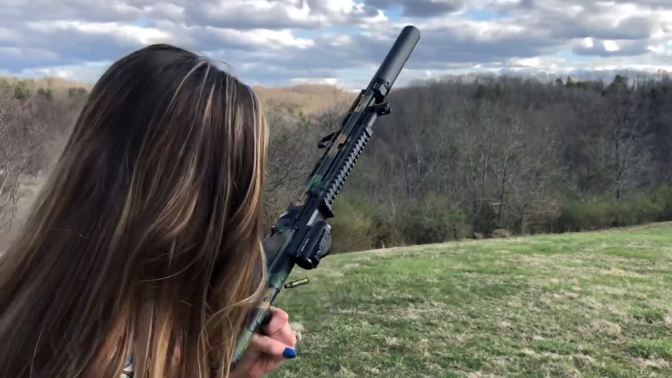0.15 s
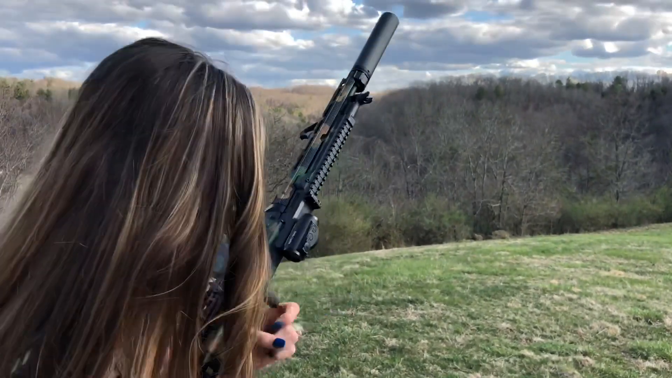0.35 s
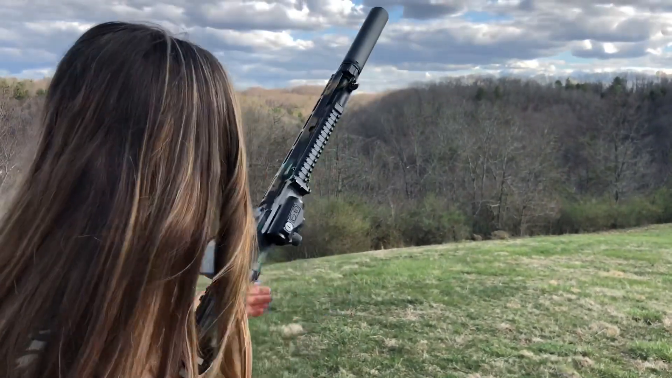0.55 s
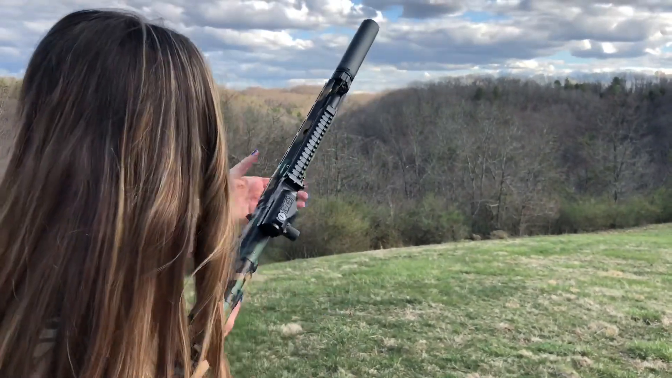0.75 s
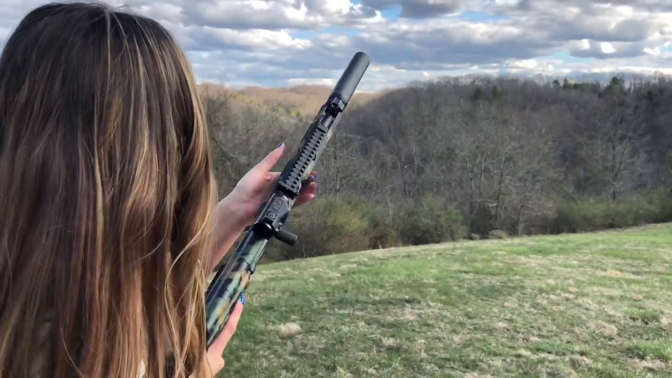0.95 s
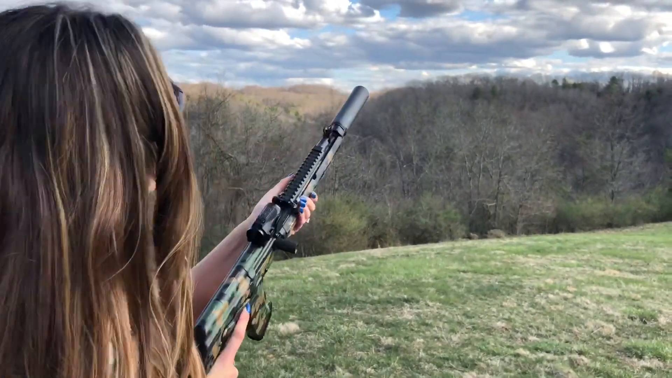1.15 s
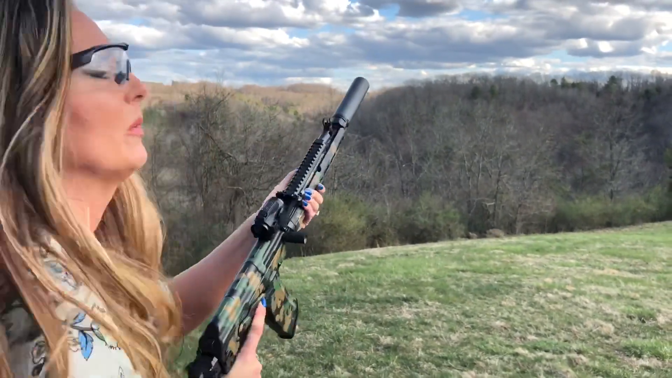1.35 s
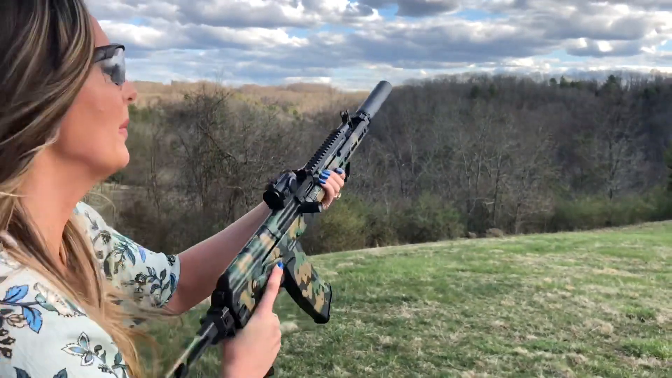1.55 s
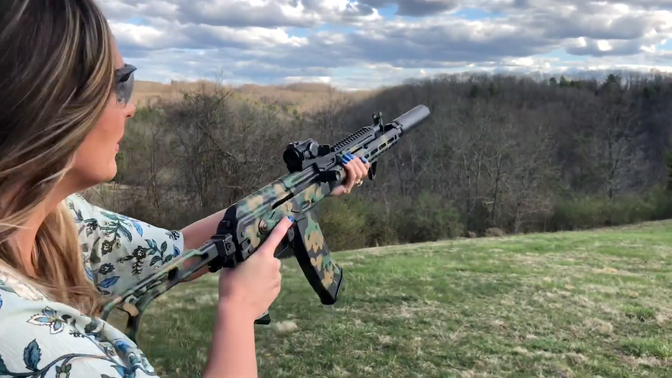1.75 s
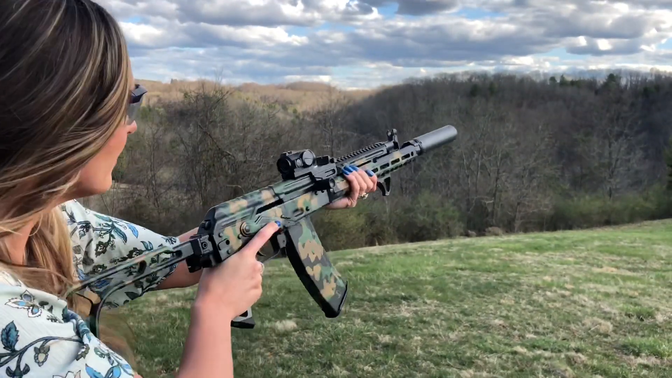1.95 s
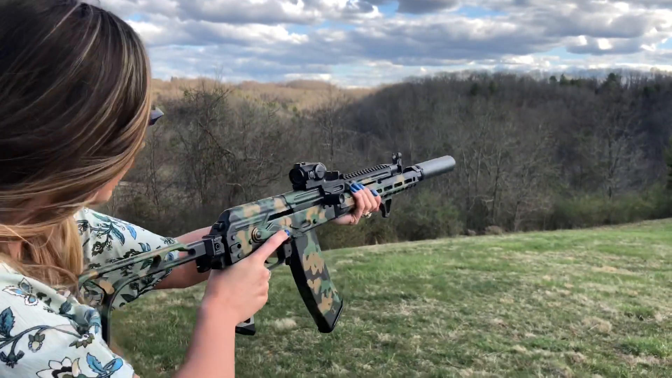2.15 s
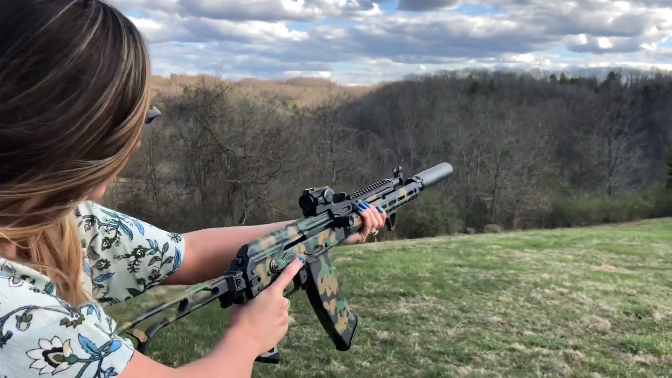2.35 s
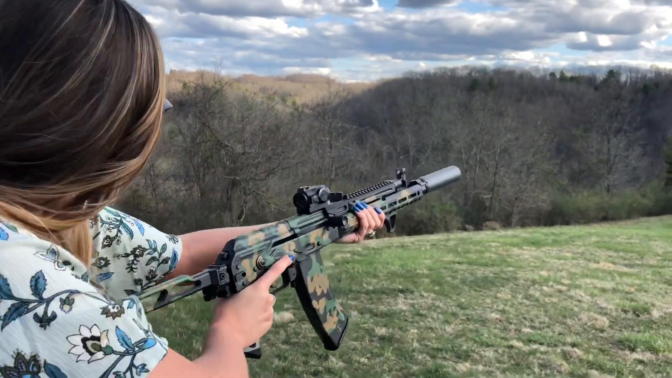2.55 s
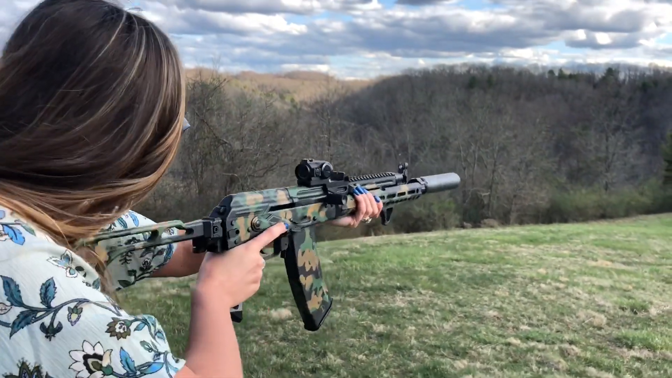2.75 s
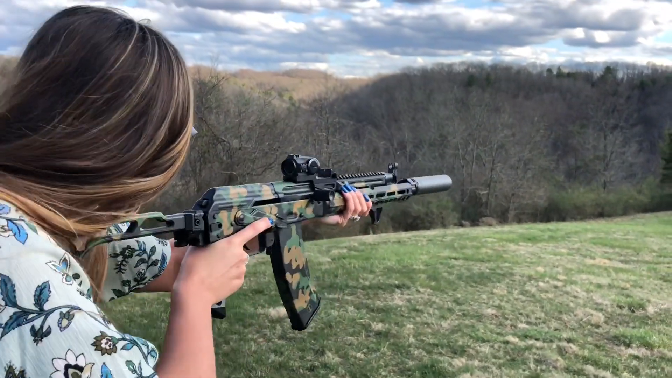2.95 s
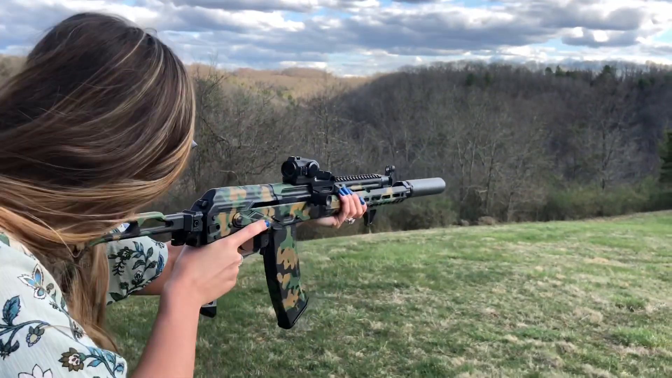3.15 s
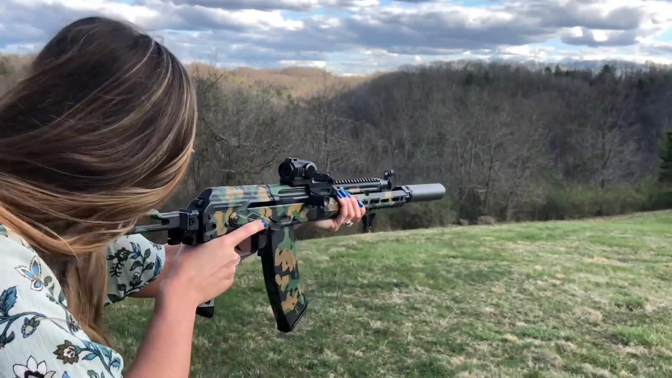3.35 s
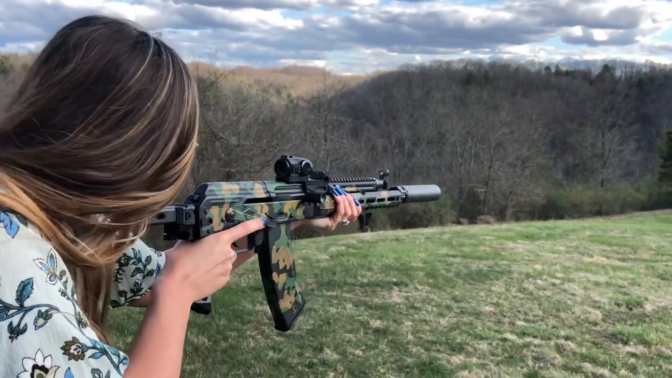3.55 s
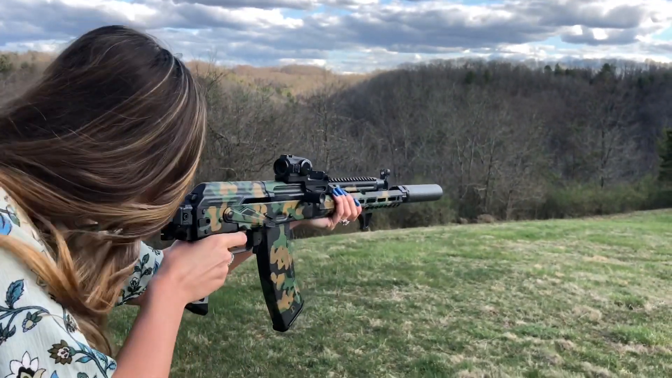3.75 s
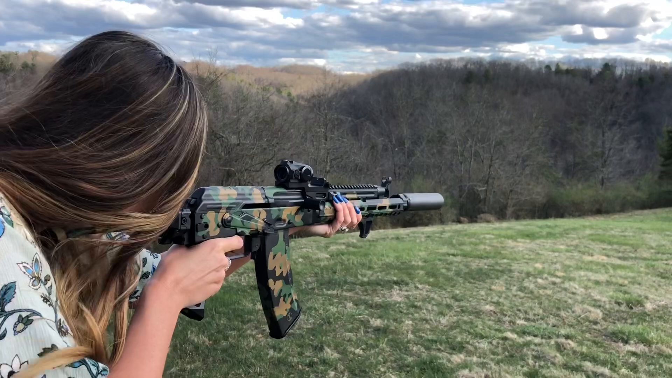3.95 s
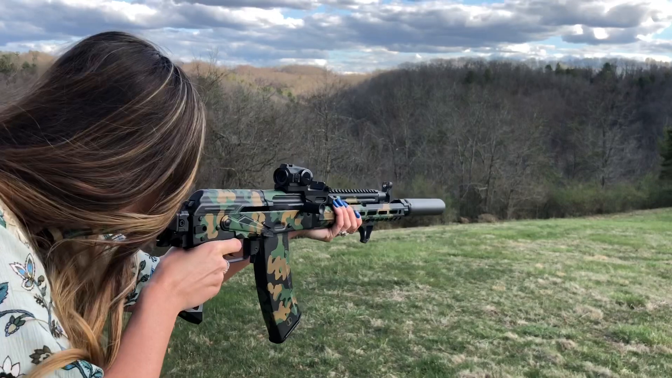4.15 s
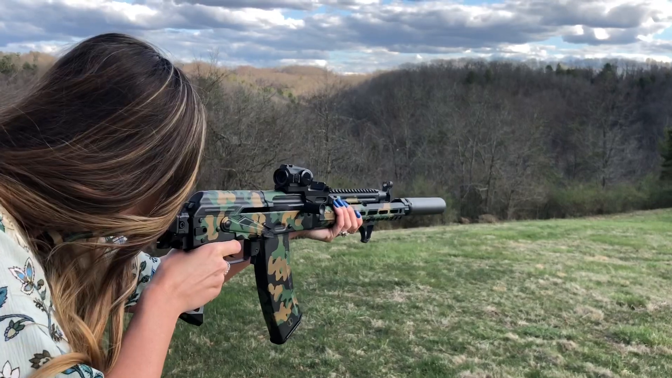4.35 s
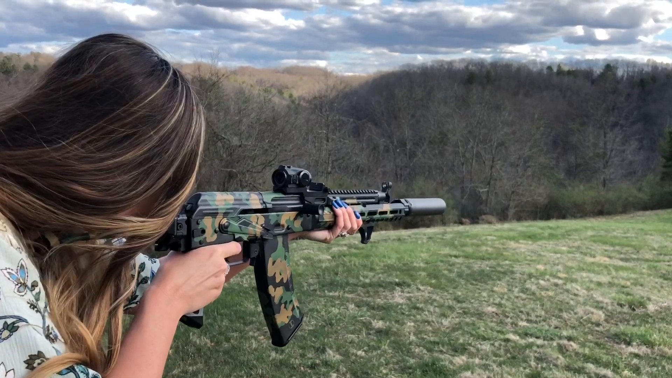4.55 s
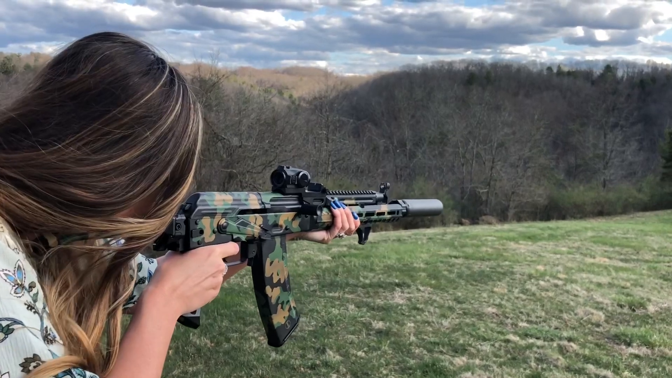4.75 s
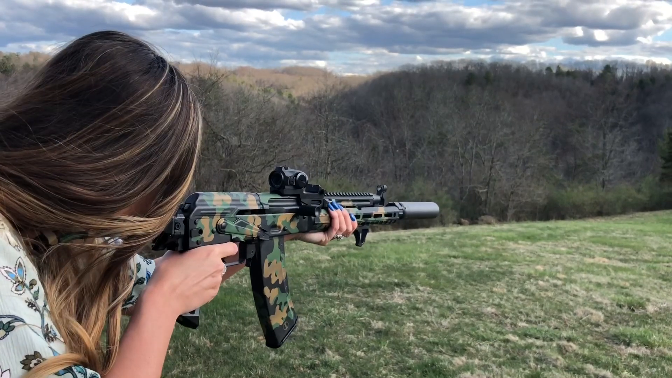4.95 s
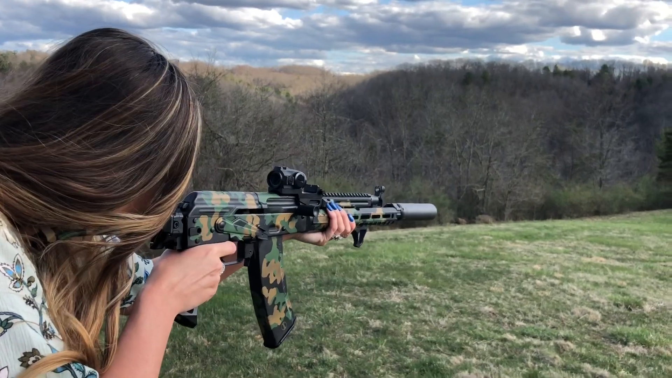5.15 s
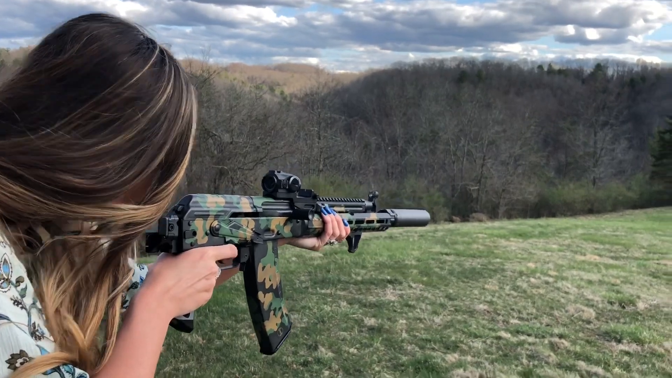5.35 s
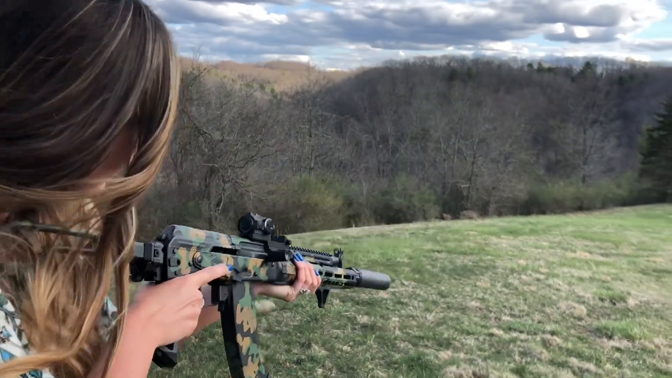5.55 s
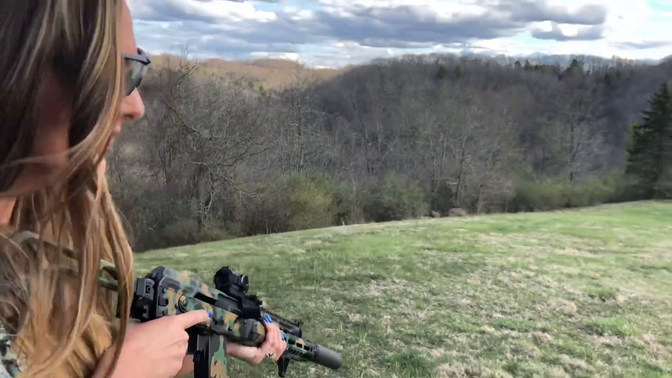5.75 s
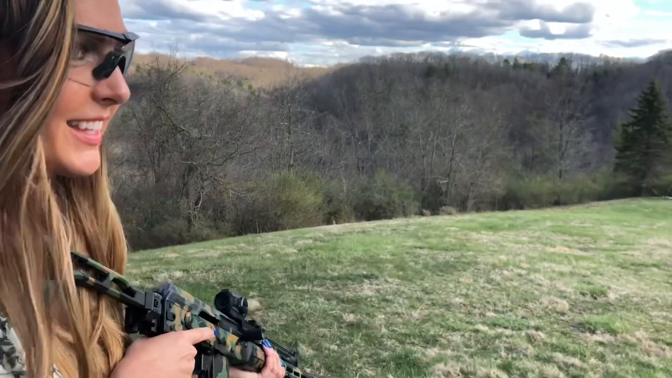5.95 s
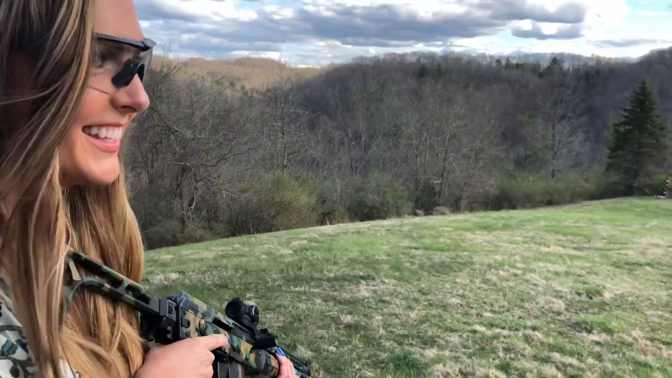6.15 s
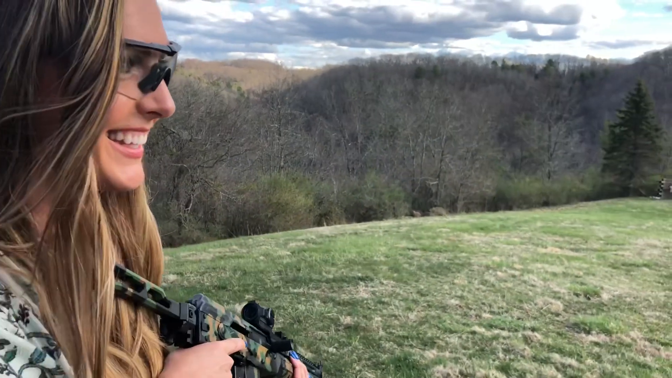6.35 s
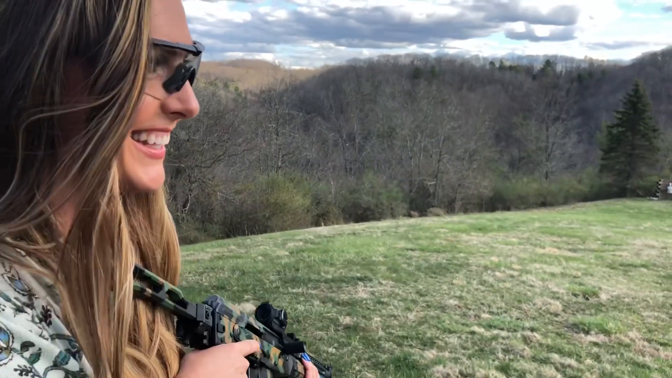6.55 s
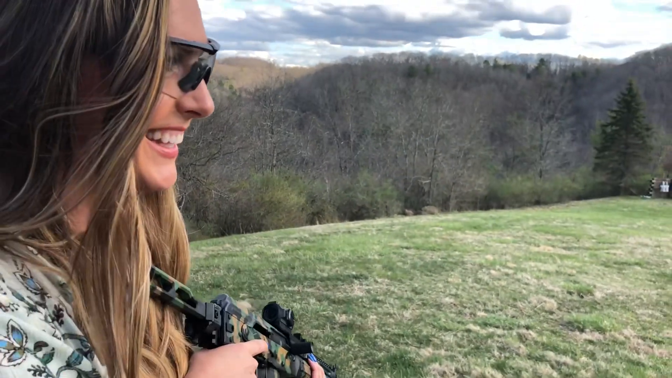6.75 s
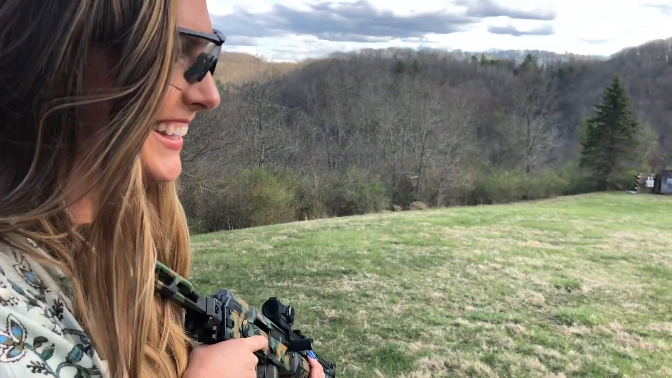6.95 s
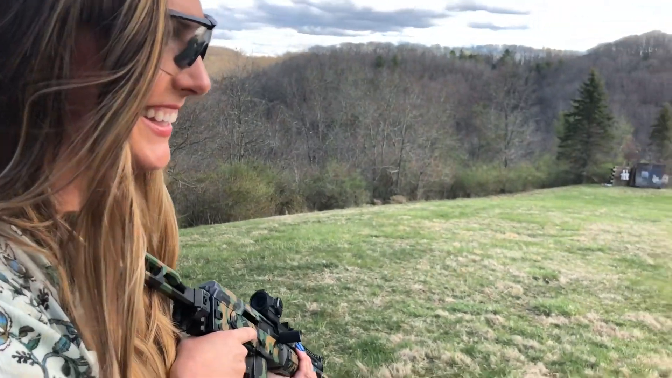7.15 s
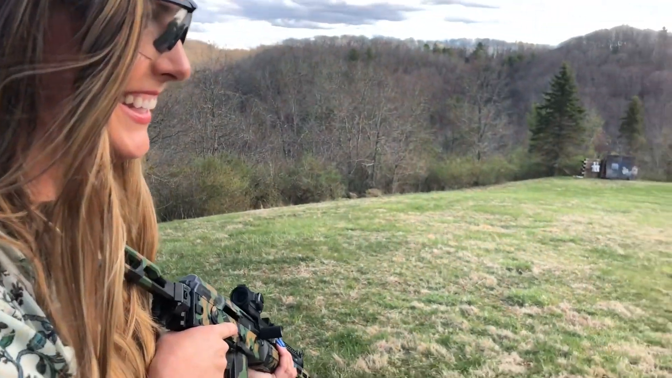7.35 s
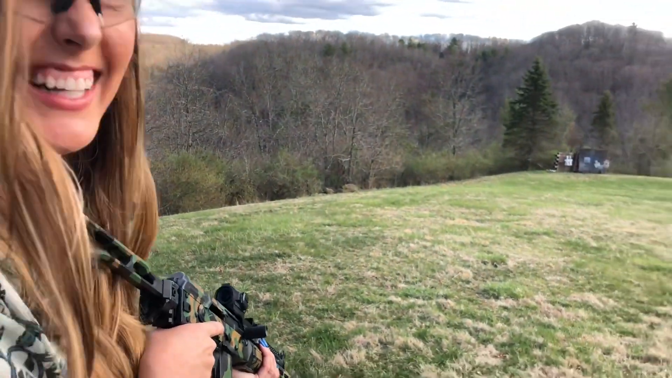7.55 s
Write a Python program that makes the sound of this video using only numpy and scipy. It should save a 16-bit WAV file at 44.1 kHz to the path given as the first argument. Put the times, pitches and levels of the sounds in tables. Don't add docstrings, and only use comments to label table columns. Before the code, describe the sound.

Outdoors on a grassy hillside, a handheld microphone beside the shooter catches loud, dry metallic racking with a spring scrape and slight ring. Faint frogs, distant hum and low wind puffs fill the pause. A single muffled rifle shot pops together with mechanical clatter; wooded slopes scatter it, and a bullet smacks distant steel with a ringing splash. A lever clicks soon after, leaving soft open-air ambience.

```python
import sys
import numpy as np
from scipy import signal
from scipy.io import wavfile
from scipy.ndimage import uniform_filter1d

SR = 44100
rng = np.random.default_rng(int(sys.argv[2]) if len(sys.argv) > 2 else 0)


def unload_wav(signal):
    wavfile.write(
        sys.argv[1],
        SR,
        np.round(np.clip(np.atleast_2d(signal).T, -1, 1) * 32767).astype(np.int16),
    )


def ratio(d):
    e = np.asarray(d, float) / 20
    return 10 ** e


N = 339129
TIME = np.arange(N) / SR

# t/s, peak/dB, body/dB, edge/dB (both re middle modes), rattle t60/s
PULL = [(.0005, -44, 0, -23.5, 0.073), (.1855, -15.5, -10, 0, .012), (.1918, -7, -15, 6, .008),
        (0.0155, -34, 4.5, -30, 0.012), (.0195, -32, 6.5, -28.5, 0.011), (0.0243, -21, -9, -2.5, 0.049),
        (0.0993, -17.5, -11.5, -1.5, 0.044), (0.118, -32, 9.5, -12.5, 0.022),
        (0.1232, -16, -11, -8.5, 0.013), (0.13, -12, -9.5, 4, 0.015), (0.144, -7, -13.5, 2, 0.027),
        (0.1603, -3, -4.5, 7, 0.013), (.1615, -4, -8, 4, .024), (.1475, -17, -12, 3, 0.014),
        (.1015, -18.5, -9.5, 0, 0.035), (0.182, -17, 7, -6, 0.013), (0.1908, 0.4, -24.5, 9.5, 0.0059),
        (0.2032, -0.5, -12, 5, 0.011), (0.2113, -10.5, -5, -12, 0.0089), (0.2146, -10, -6, -3.5, 0.015),
        (0.2222, -4.5, -15.5, 3, 0.019), (0.237, -21.5, 4, -9, .009), (0.2495, -27, -8.5, -6, 0.016)]
RETURN = [(0.3316, -39.5, -6, -26.5, 0.01), (0.3348, -33, -6, 0.5, 0.02), (0.348, -40, -6, -20, 0.054),
          (0.4243, -27, -10.5, -10, 0.017), (0.4392, -22, -10.5, -9, 0.0095),
          (0.442, -16, -11, -10.5, 0.02), (0.4568, -10.5, -15, 5, 0.013), (0.466, -16.5, -2, -3.5, 0.015),
          (0.4783, -13, -15, -3.5, 0.015), (.4808, -17, -10, -4.5, .012), (.5045, -19, -10, 3, .01),
          (0.4838, -12.5, -11.5, -10.5, 0.013), (.487, -13.5, -8.5, -4, 0.012),
          (0.4912, -4.5, -15.5, 7.5, 0.0096), (0.5006, 0.5, -25, 4, 0.007), (0.5082, -3, -9.5, 5, 0.01),
          (.5096, 0, -7.5, 7, .012), (.5035, -9.5, -8.5, 0.5, 0.009), (.519, -17.5, -12, 3, .02),
          (0.5245, -17.5, -14, 3.5, 0.016), (.528, -14.5, -14, 4, 0.048)]
CYCLING = [(4.5733, -33, -8, -18.5, 0.016), (4.582, -36.5, -2, -7.5, .014), (4.5973, -14, -6.5, 1, 0.01),
           (4.5995, -10.5, -3, -3.5, 0.011), (4.6048, -2, -10, 6.5, 0.007), (4.6088, -9.5, -14.5, 3, 0.012),
           (4.6205, -19.5, -19, 6, 0.011), (4.6222, -11.5, -17.5, 9.5, .008),
           (4.624, -14, -16.5, 6.5, .012), (4.6458, -10, -4, 1, .008), (4.6436, 0, -7, 3, 0.007),
           (4.6444, -8, -12, 7, .006), (4.5862, -42, -8, -3, .008), (4.5942, -34.5, -3.5, -11.5, .008),
           (4.631, -19.5, -16, 3, .012), (4.6515, -23.5, 1.5, -1.5, .02), (5.4095, -23.5, -22, -1, 0.024)]
# t/s, level/dB, f/Hz, t60/s
PINGS = [(.1443, -12, 5600, .008), (.1608, -12, 9290, .01), (.1612, -11.5, 14800, .008),
         (.1915, -7, 9795, .006), (.2034, -7.5, 4100, .008), (.2114, -12, 3002, .007),
         (.2228, -15, 7290, .011), (.4572, -17, 5800, .01), (.5008, -10.5, 3301, .01),
         (.5012, -12, 8300, .01), (.5086, -9.5, 6000, .008), (.5088, -12.5, 8580, .008),
         (4.6438, -10, 5120, .008), (4.6442, -10, 2608, .01), (4.6, -18.5, 2107, .012),
         (5.4098, -29.5, 3320, .014), (5.4098, -37, 6260, .012)]
# f/Hz, t60/s
RECEIVER = [(904, 0.038), (1290, 0.023), (1650, 0.037), (2300, 0.018), (2700, 0.016), (3320, 0.038),
            (4090, 0.026), (5070, 0.011), (5970, 0.021), (6830, 0.02), (7600, 0.019), (8900, 0.01),
            (10100, 0.0074), (11300, 0.016), (12800, 0.0059), (14000, 0.0077), (14900, 0.01),
            (15800, 0.015)]

# start/s, full/s, end/s, level/dB, tilt/(dB/octave)
STROKES = [
    (0.094, 0.12, .16, -32.5, -2.25),
    (0.17, 0.185, .228, -28, -1.5),
    (0.42, 0.4777, .515, -26, 0.5),
    (4.572, 4.585, 4.595, -52, -0.5),
    (0.38, .42, .435, -59, -3),
    (.225, 0.29, 0.22, -42, -4),
]
# start/s, full/s, end/s, level/dB, tilt/(dB/octave)
VENTS = [
    (4.594, 4.604, 4.612, -23.5, 2),
    (4.6, 4.61, 4.634, -29.5, 2.4),
    (4.636, 4.644, 4.648, -29.5, 0),
]
# f/Hz, density/(dB per Hz)
SLIDE = [(180, -52.5), (300, -21.5), (877, -1), (1170, -4), (2280, -3), (3360, 0.5), (4390, -6.5),
         (5740, -3), (14900, -7.5), (16500, -16)]

# f/Hz, level/dB, t60/s
BOLT = [(4317, -22, 0.2), (5093, -8, 0.12), (5669, -14, .08), (6175, -18, 0.073), (6708, -5, 0.1),
        (7736, -30, 0.12), (9964, -9, 0.14), (10580, -2, 0.15), (10690, -8, 0.1), (10900, -22, 0.18),
        (11030, -7, 0.13), (11930, -9, 0.066), (12210, -41, 0.26)]
CASE_RING = [(3085, 2, .9), (3250, 1, .9), (3256, -8, 1.8)]
HANDLE = [(3688, -10, 0.12), (4231, -13, 0.15), (4635, 0, 0.09), (5292, -2, 0.068), (5701, -6, 0.087),
          (6148, -6, 0.071), (7074, -3, 0.061), (9970, -6, 0.099), (10320, -16, 0.13), (10590, -8, 0.17),
          (11310, -13, 0.095), (12000, -14, 0.12)]
SPRING = [(554, 0, .8), (888, 2, .12), (1650, 8, .1), (1930, 6, .08)]
SPRING_KNOCK = [(900, 1, .04)]
LUG = [(7900, 0.5, 0.034)]
STOCK = [(466.3, 0, 0.12), (330, -9.5, 0.047)]
CAN = [(947, -4, .2), (3720, 3, .27), (8600, -2, .12), (11790, -8, .2)]
LEVER = [(953, -1, .062), (1260, -3, .03), (1669, -6, .02), (2050, -10, .02), (2950, -2, .018),
         (3380, 6, .022), (4450, -1, .018), (6100, -3, .018), (10200, -8, .015)]
PLATE = [(872, -5, 0.75), (1114, -6, 0.75), (1723, -3, 0.61), (1742, -9, .4), (2466, 0, 0.3),
         (2837, -5, 0.52), (3257, -6, 0.4), (3935, -8, 0.45), (4081, -6, 0.41), (4683, 0, 0.39),
         (4737, -11, 0.55), (5373, -9, 0.45), (5771, -5, 0.29), (6029, -17, 0.42), (6266, -11, 0.35),
         (6358, -14, 0.41), (6869, -12, 0.28), (7585, -6, 0.21), (7773, -11, 0.23), (8236, -13, 0.42),
         (8915, -7, 0.14), (9609, -10, 0.39), (11060, -22, 0.51), (11820, -30, 0.31), (13430, -34, 0.38)]
STAND = [(204, 7.5, 0.13), (120.4, -2, 0.38)]
# t/s, level/dB, modes
RINGS = [(.213, -35, STOCK), (.5, -40.5, STOCK), (0.024, -45, HANDLE), (.24, -60.5, SPRING[:1]),
         (0.13, -22, LUG), (.494, -23, SPRING_KNOCK), (.506, -17, SPRING_KNOCK), (0.524, -40.5, SPRING[1:]),
         (0.521, -21, BOLT), (0.54, -56.5, CASE_RING[:1]), (.62, -57, CASE_RING[1:]), (4.647, -47.5, CAN),
         (5.003, -41, PLATE[:2]), (5.003, -38.5, PLATE[2:18]), (5.003, -39.5, PLATE[18:]),
         (5.002, -48.5, STAND), (5.4105, -29.5, LEVER)]

# t/s, peak/dB, centre f/Hz
STRIKE = [
    (5.0004, -16.5, 7060),
    (5.0034, -15.5, 7200),
    (5.0045, -25, 4480),
    (5.007, -20, 4960),
    (5.0094, -13.5, 3580),
    (5.012, -20, 4000),
    (5.019, -23, 3000),
]
# f/Hz, density/(dB per Hz)
SPLASH = [(240, -65), (400, -38.5), (581, -19), (740, -9), (899, -5), (1550, -0.5), (2150, -6),
          (2800, -5.5), (5060, -9), (8060, -3), (12700, -25), (15700, -48), (16500, -58)]
# f/Hz, t60/s
SPLASH_T60 = [(500, 0.31), (1300, 0.62), (3500, 0.93), (9000, 0.21), (16000, 0.12)]

# arrival/s, end/s, first level/dB, last level/dB, first tilt/(dB/octave)
ECHOES = [
    (0.628, 0.708, -53, -71, -0.5),
    (0.639, 1.201, -58, -84.5, -2.5),
    (4.685, 4.929, -52, -60, 7),
    (4.797, 5.011, -60, -57.5, 2.5),
]
# f/Hz, density/(dB per Hz)
SLOPES = [(240, -41), (400, -22), (885, -3.5), (1170, -11.5), (1310, -7), (2550, -1), (3170, 2.5),
          (3820, -7.5), (4400, -0.5), (7820, -7.5), (15000, -15.5), (15700, -13.5), (16500, -32)]
# t/s, peak/dB, centre f/Hz, length/s
TREES = [(4.832, -55, 4700, 0.064), (4.932, -53, 4300, 0.042), (4.691, -48, 1700, 0.0093),
         (4.727, -49.5, 2700, 0.012), (4.775, -52, 5000, 0.015), (4.801, -46, 3200, 0.0087),
         (4.833, -50, 4400, 0.012), (4.72, -54, 9400, .05), (4.853, -50, 4600, .014),
         (4.895, -55, 4600, 0.021), (4.975, -52, 4900, 0.011), (4.861, -50, 2400, 0.008),
         (4.904, -46, 3200, .006), (4.912, -48, 3900, 0.0072), (4.946, -47, 2600, .006),
         (4.953, -52, 4180, 0.0072), (4.968, -46, 2000, 0.0088), (0.7, -51, 4200, 0.013),
         (0.655, -48, 4000, 0.011), (0.982, -60, 880, .015)]

# t/s, peak/dB, length/s, lowest f/Hz
RUSTLES = [(0.765, -53, .012, 5980), (0.786, -70.5, .012, 9080), (0.981, -72, 0.031, 8960),
           (1.001, -62, 0.0024, 6500), (1.085, -62.5, 0.0092, 8020), (1.1, -65.5, .012, 10000),
           (1.216, -71.5, .015, 6990), (1.387, -69, .03, 12100), (5.387, -72, 0.016, 8900),
           (5.395, -56, 0.0091, 2980), (5.5, -64, 0.0072, 9720), (5.629, -62.5, 0.0035, 9980),
           (5.655, -69.5, 0.0037, 11940), (7.093, -69.5, .004, 10900), (7.56, -70.5, 0.08, 8770),
           (2.621, -77, 0.13, 898), (0.079, -56, .008, 5000), (0.103, -50, .002, 2000)]
# t/s, level/dB, first f/Hz
BIRD = [
    (3.633, -69, 8200),
    (7.546, -68.5, 8400),
]
# t/s, level/dB, first f/Hz
PEEPS = [(0.818, -71, 3025), (0.888, -80, 3025), (0.893, -65, 2775), (1.059, -64.5, 2566),
         (1.068, -74.4, 2890), (1.167, -60.5, 2525), (1.373, -65.5, 2375), (1.497, -71, 2250),
         (1.502, -67, 2750), (1.551, -67, 2390), (1.746, -66.5, 2710), (1.747, -61.5, 2510),
         (1.751, -74, 2890), (1.851, -70, 2596), (1.985, -70, 2450), (2.095, -69, 2740), (2.35, -67, 2655),
         (2.479, -64, 2450), (2.579, -76, 2625), (2.834, -65, 2525), (2.908, -71, 2460), (3.019, -69, 2350),
         (3.228, -73, 2790), (3.427, -70, 2450), (3.477, -73, 2910), (3.494, -64.5, 2635),
         (3.652, -69, 2425), (3.732, -73, 2830), (3.856, -68, 2450), (4.091, -76, 2950), (4.162, -65, 2600),
         (4.195, -71, 2425), (4.375, -71, 2835), (4.42, -68, 2650), (5.533, -71, 2877), (5.727, -65, 2625),
         (6.021, -64.5, 2700), (6.356, -71.5, 2830), (6.67, -72.5, 2870), (6.745, -74, 2770),
         (6.864, -74.5, 2160), (6.899, -65.5, 2725), (7.169, -70, 2450), (7.219, -67.5, 2670),
         (7.538, -69.5, 2735)]
# t/s, depth/dB, recovery/s
DUCKS = [
    (.1, -1.5, 0.27),
    (4.6, 4.5, 0.7),
]
# middle t/s, peak/dB, half length/s
GUSTS = [(0.112, -56, 0.021), (0.532, -62, .022), (0.86, -58, 0.036), (1.499, -71, 0.035),
         (1.901, -74, 0.043), (2.16, -68, 0.022), (2.271, -59, 0.023), (2.61, -59, 0.024),
         (3.031, -52.5, 0.028), (3.352, -57, 0.021), (3.61, -62, 0.028), (3.703, -53.5, .035),
         (3.828, -57.5, .018), (3.888, -53, 0.019), (3.942, -47, 0.013), (3.989, -49, 0.011),
         (4.058, -60.5, 0.019), (4.25, -66.5, .05), (4.527, -59, 0.026), (4.626, -42.5, 0.019),
         (4.843, -79, 0.046), (5.063, -54.5, 0.082), (5.504, -67, 0.048), (5.628, -68, .03),
         (6.421, -57, 0.036), (6.529, -52.5, 0.016), (6.722, -52, 0.019), (6.869, -59, 0.024),
         (6.917, -55.5, 0.025), (7.6, -61, 0.039)]
# f/Hz, level/dB rms
HUM = [(242.2, -73.5), (290.7, -77)]
# f/Hz, density/(dB per Hz)
AIR = [(60, -30), (100, -3.5), (170, 1.5), (240, 1.5), (500, -4.5), (900, -12), (2000, -18.5), (3300, -22),
       (6000, -26), (10000, -30.5), (14000, -32), (16500, -32.5)]


def rms_one(x):
    return x / np.sqrt(np.mean(x ** 2) + 1e-20)


def in_time(rows, outside=None):
    s, *columns = np.transpose(rows)
    return [np.interp(TIME, s, c, outside, outside) for c in columns]


def at_hz(points, hz):
    points_hz, values = np.array(points).T
    return np.interp(np.log(hz), np.log(points_hz), values)


def add(out, s, x):
    i = round(s * SR)
    out[i:i + len(x)] += x[:N - i]


def butter(x, hz, kind, order=2):
    return signal.sosfilt(signal.butter(order, hz, kind, fs=SR, output="sos"), x)


def chirp(hz):
    return np.sin(2 * np.pi * np.cumsum(hz) / SR)


def drift(rate_hz):
    r = np.exp(-80 * np.pi * rate_hz / SR)
    slow = signal.lfilter([1], [1, -2 * r, r * r], rng.standard_normal(N // 40 + 2002))[2000:]
    return np.interp(np.arange(N) / 40, np.arange(len(slow)), rms_one(slow))


def ring(x, hz, t60_s):
    r, w = ratio(-60 / (t60_s * SR)), 2 * np.pi * hz / SR
    return signal.lfilter([0, np.sin(w)], [1, -2 * r * np.cos(w), r * r], x + 1e-18)


def bands(white, spectrum):
    edges_hz = np.geomspace(90, 18000, 22)
    hz = np.sqrt(edges_hz[1:] * edges_hz[:-1])
    rows = [butter(white[k % 2], edges_hz[k:k + 2], "band") for k in range(len(hz))]
    coloured = ratio(at_hz(spectrum, hz))[:, None] * rows
    return hz[:, None], rms_one(coloured) / np.sqrt(len(hz))


def wash(tables, spectrum, grain_db, patchy_db):
    out = np.zeros(N)
    together = drift(81)
    apart = np.repeat([drift(22) for k in range(7)], 3, axis=0)
    for rows in tables:
        span = slice(round(rows[0][0] * SR), round(rows[-1][0] * SR))
        level_db, tilt_db = (c[span] for c in in_time(rows))
        shape = (2, len(level_db))
        grains = ratio(grain_db * np.minimum(rng.exponential(1, shape), 4))
        hz, noise = bands(rng.standard_normal(shape) * grains, spectrum)
        patches_db = patchy_db * (together[span] + apart[:, span])
        gains = ratio(level_db + tilt_db * np.log2(hz / 4000) + patches_db)
        out[span] += (gains * noise).sum(0) * signal.windows.tukey(shape[1], .04)
    return out


def clacks(table):
    out, t = np.zeros(N), TIME[:2500]
    modes_hz, modes_t60_s = np.transpose(RECEIVER)
    modes_in_band_db = 10 * np.log10([1, 4, 6, 7])
    for s, db, body_db, edge_db, t60_s in table:
        envelope = ratio(7.0 - 60 * t / 0.003) + ratio(-60 * t / max(t60_s, .004)) + ratio(-23 - 60 * t / 0.055)
        burst = rng.standard_normal(len(t)) * (1 - np.exp(-t / 0.0002)) * envelope
        colour_db = [body_db, body_db / 2 - 7.5, 0, edge_db, 1.2 * edge_db - 6]
        colour = np.transpose([[900, 1500, 3200, 8000, 15500], colour_db])
        colour[[0, 2, 3, 4], 1] -= modes_in_band_db
        scatter_db = rng.normal(0, 1.5, len(modes_hz)) * (modes_hz > 1000)
        gains = ratio(at_hz(colour, modes_hz) + scatter_db)
        shifted_hz = modes_hz * (1 + rng.normal(0, .03, len(modes_hz)))
        decays_s = modes_t60_s * np.clip(t60_s / 0.022, .45, 1)
        crack = butter(burst, 4200, "high")
        sound = ratio(1.5 + 0.82 * edge_db) * crack / np.sqrt(np.mean(crack[:220] ** 2))
        for k, (gain, hz, decay_s) in enumerate(zip(gains, shifted_hz, decays_s)):
            skirt = 0.61 * np.sqrt(5.0) * ring(burst, hz, decay_s / 12.0)
            mode = ring(burst, hz, decay_s) + skirt
            sound = sound + (-1) ** k * gain * mode / np.sqrt(np.mean(mode[:220] ** 2))
        add(out, s, ratio(db) * sound / np.abs(sound).max())
    return out


def pings():
    out, t = np.zeros(N), TIME[:1500]
    for s, db, hz, t60_s in PINGS:
        burst = rng.standard_normal(len(t)) * ratio(-60 * t / max(t60_s, .003))
        ping = ring(burst, hz, max(t60_s / 2, .002))
        add(out, s, ratio(db) * ping / np.abs(ping).max())
    return out


def strokes(table, grain_db, patchy_db):
    rise_db, release_db, release_db_per_s = 27.5, 45.5, 680
    release_s = release_db / release_db_per_s
    shapes = [[(s, db - rise_db, tilt), (full, db, tilt), (end, db, tilt),
               (end + release_s, db - release_db, tilt)]
              for s, full, end, db, tilt in table]
    return wash(shapes, SLIDE, grain_db, patchy_db)


def near_echo(x):
    level_db, t60_s, cutoff_hz = -34, .5, 2000
    t = TIME[:SR // 2]
    tail = butter(rng.standard_normal(len(t)), cutoff_hz, "low", order=1) * ratio(-60 * t / t60_s)
    return ratio(level_db) * signal.fftconvolve(x, tail / np.linalg.norm(tail))[:N]


def rings():
    flutter_db, rise_s = 1.8, 0.0011
    out, t = np.zeros(N), TIME[:SR]
    flutter = [ratio(flutter_db * drift(14)[:len(t)] * np.minimum(t / .1, 1)) for k in range(4)]
    for s, db, modes in RINGS:
        for k, (hz, mode_db, t60_s) in enumerate(modes):
            fade = ratio(db + mode_db - 60 * t / min(t60_s, 2.5)) * (1 - np.exp(-t / rise_s))
            tone = np.sin(2 * np.pi * (hz * t + rng.random()))
            add(out, s, fade * flutter[k % 4] * tone)
    return out


def blast():
    blast_s, blast_db, push_db = 4.6052, -4, -29
    out, t = np.zeros(N), TIME[:3000]
    sweep = chirp(350 + 13000 * np.exp(-t / 0.00078)) * (1 - 1.6 * np.exp(-t / 0.00048))
    push = ratio(-60 * t / .08) * chirp(70 + 400 * np.exp(-t / .006))
    add(out, blast_s, ratio(blast_db - 60 * t / 0.012) * sweep)
    add(out, blast_s + 0.00085, ratio(push_db) * push)
    return out


def plate():
    out, t = np.zeros(N), TIME[:SR // 2]
    for s, db, hz in STRIKE:
        burst = rng.standard_normal(200) * ratio(-60 * t[:200] / 0.0021)
        crack = butter(burst, [hz / 1.9, hz * 1.24], "band")
        add(out, s, ratio(db) * crack / np.abs(crack).max())
    hz, noise = bands(rng.standard_normal((2, len(t))), SPLASH)
    t60_s = np.clip(at_hz(SPLASH_T60, hz), .03, 3)
    fade = ratio(-14.5 - 60 * t / (0.13 * t60_s)) + ratio(-36.0 - 60 * t / t60_s)
    rise = 1 - np.exp(-t * hz / 20.0)
    add(out, STRIKE[0][0], (noise * fade * rise).sum(0))
    return out


def slopes():
    rise_s, rise_db, last_tilt_db = 0.04, 16.5, -3.5
    shapes = [[(s - rise_s, db - rise_db, tilt), (s, db, tilt), (end, last_db, last_tilt_db)]
              for s, end, db, last_db, tilt in ECHOES]
    return wash(shapes, SLOPES, grain_db=2.2, patchy_db=1.3)


def trees():
    out = np.zeros(N)
    for s, db, hz, length_s in TREES:
        t = TIME[:8000] / max(length_s, .002)
        width = 1.06 + 0.0025 / max(length_s, .002)
        puff = butter(rng.standard_normal(8000), [hz / width, hz * width], "band")
        add(out, s, ratio(db) * rms_one(puff) * t * np.exp(-t * t))
    return out


def rustles():
    out = np.zeros(N)
    for s, db, length_s, low_hz in RUSTLES:
        t = TIME[:8000] / max(length_s, .002)
        noise = butter(rng.standard_normal(8000), low_hz, "high")
        add(out, s, ratio(db) * noise * 2 * t * np.exp(-t * t))
    return out


def bird():
    note_s, aim_hz, fall_s = 0.1, 5600, 0.077
    out, t = np.zeros(N), TIME[:6000]
    shape = np.sin(np.pi * np.clip(t / note_s, 0, 1))
    for s, db, hz in BIRD:
        pitch_hz = aim_hz + (hz - aim_hz) * np.exp(-t / fall_s)
        add(out, s, np.sqrt(2) * ratio(db) * shape * chirp(pitch_hz))
    return out + ratio(-8) * np.roll(out, round(0.018 * SR))


def near_frogs():
    peep_s, rise_hz_per_s, gain_db = .09, 3000, -1.2
    out, t = np.zeros(N), TIME[:5800]
    shape = np.sin(np.pi * np.clip(t / peep_s, 0, 1)) ** 0.56
    for s, db, hz in PEEPS:
        pulse_db = 3.9 * np.sin(2 * np.pi * (45 * t + rng.random()))
        level = np.sqrt(2) * ratio(db + gain_db + pulse_db)
        add(out, s, level * shape * chirp(hz + rise_hz_per_s * t))
    return out


def frogs(count=2800):
    level_db, swing_db = -65.5, -0.85
    out, t = np.zeros(N), TIME[:5800]
    for when, size, spread, length, far in rng.random((count, 5)):
        hz = 2310 + 290 * (size + spread) + 50 * np.sin(when * 45) + 3000 * t
        shape = np.sin(np.pi * np.clip(t / (.05 + .05 * length), 0, 1))
        add(out, when * (N - 1) / SR, ratio(-9 * far ** .25) * shape * chirp(hz))
    tail = rng.standard_normal(SR // 2) * ratio(-60 * TIME[:SR // 2] / .5)
    wet = signal.fftconvolve(out, tail)[:N]
    chorus = rms_one(rms_one(out) + ratio(-4.5) * rms_one(wet))
    ducked_db = sum(db * (TIME > s) * np.clip(1 - ((TIME - s) / back_s) ** 2, 0, 1)
                    for s, db, back_s in DUCKS)
    return ratio(level_db + swing_db * drift(0.67) - ducked_db) * chorus


def wind():
    breeze_db, swing_db = -68, 1
    noise = rms_one(butter(rng.standard_normal(N), [42, 115], "band"))
    even = np.sqrt(uniform_filter1d(noise ** 2, size=2500) + 0.51)
    puffs = sum(ratio(db) * np.exp(-((TIME - s) / half_s) ** 2) for s, db, half_s in GUSTS)
    return (ratio(breeze_db + swing_db * drift(4)) + puffs) * noise / even


def air():
    level_db = -65
    hz, noise = bands(rng.standard_normal((2, N)), AIR)
    far = ratio(level_db) * sum(row * ratio(0.48 * drift(0.69)) for row in noise)
    hum = sum(ratio(db + 2 + 3.5 * drift(2.1)) * chirp(hum_hz + 3.2 * drift(2.6)) for hum_hz, db in HUM)
    return far + hum


def scene():
    action = clacks(PULL) + clacks(RETURN) + clacks(CYCLING) + pings()
    action = action + strokes(STROKES, grain_db=4.0, patchy_db=2.5)
    action = action + strokes(VENTS, grain_db=2.0, patchy_db=1.3)
    action = butter(action, 580, "high", order=4)
    rifle = action + near_echo(action) + rings()
    shot = blast() + plate() + slopes() + trees()
    background = rustles() + bird() + near_frogs() + frogs() + wind() + air()
    return (rifle + shot + background)[None]


def band_limit(x):
    return signal.sosfilt(signal.butter(12, 16830, fs=SR, output="sos"), x)


def record(dry):
    rounded = 1.221 * np.tanh(dry / 1.162)
    top_cut = signal.cheby2(12, 60, 16800, fs=SR, output="sos")
    mix = signal.sosfilt(top_cut, rounded)
    return band_limit(mix)


dry = scene()
out = record(dry)
unload_wav(out)
```